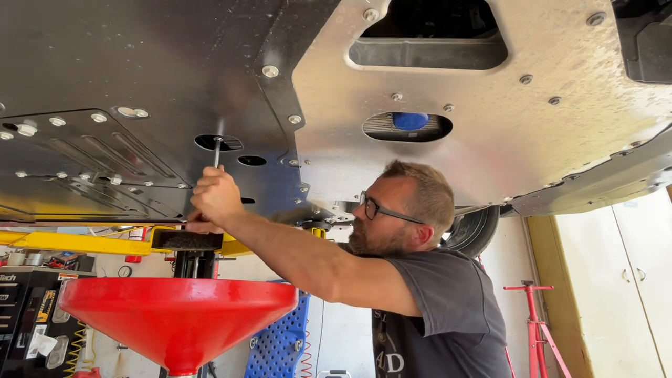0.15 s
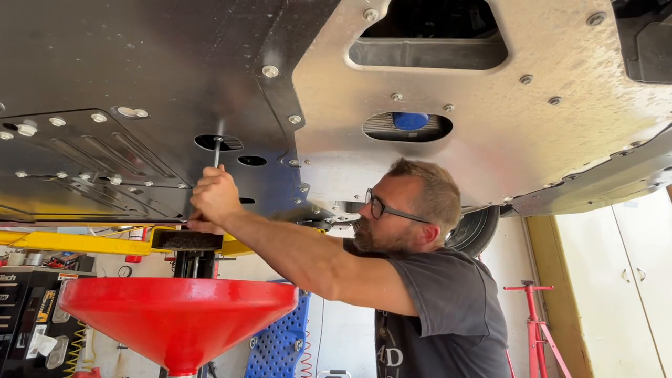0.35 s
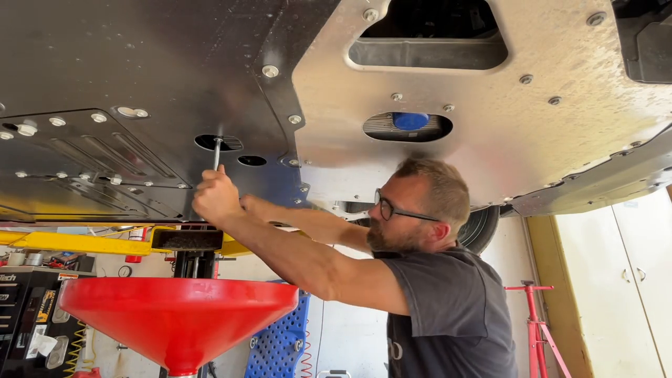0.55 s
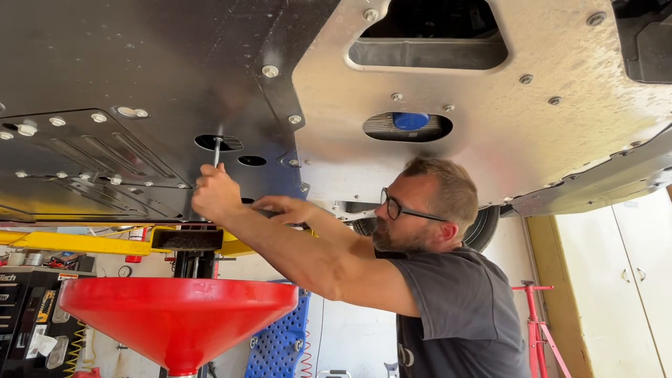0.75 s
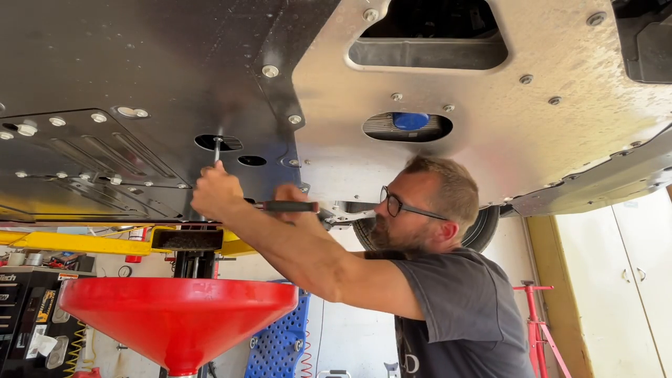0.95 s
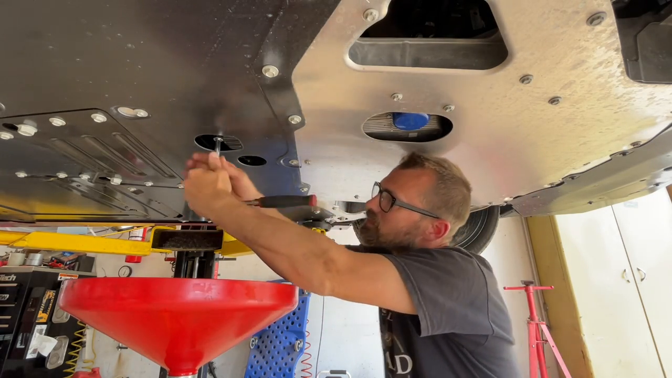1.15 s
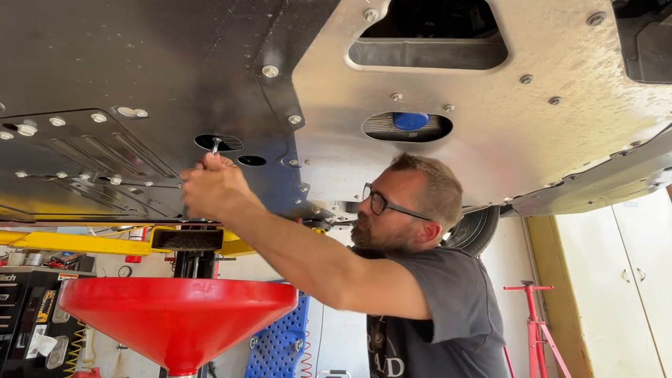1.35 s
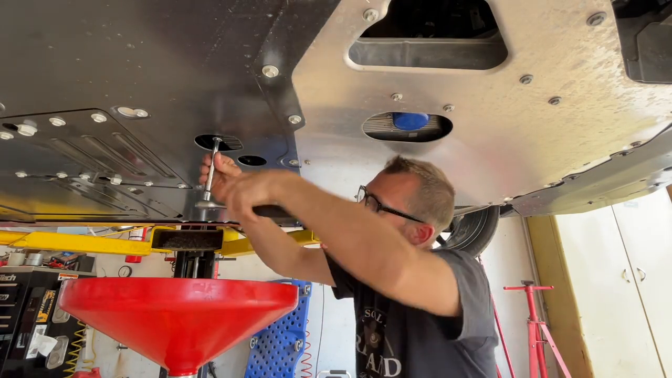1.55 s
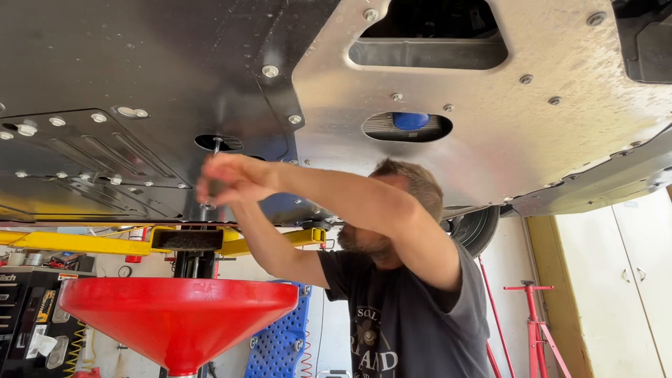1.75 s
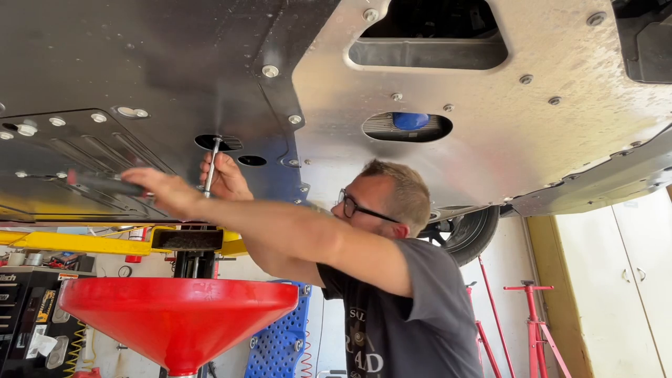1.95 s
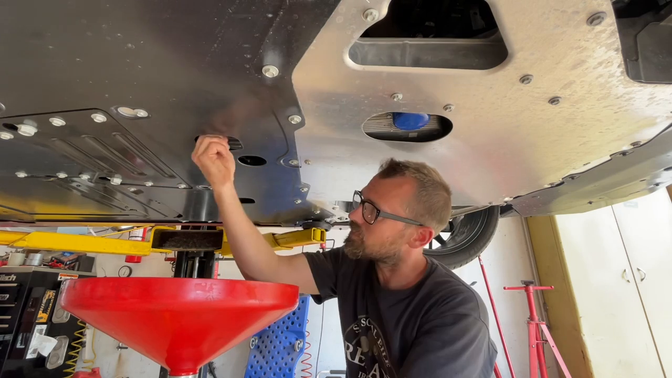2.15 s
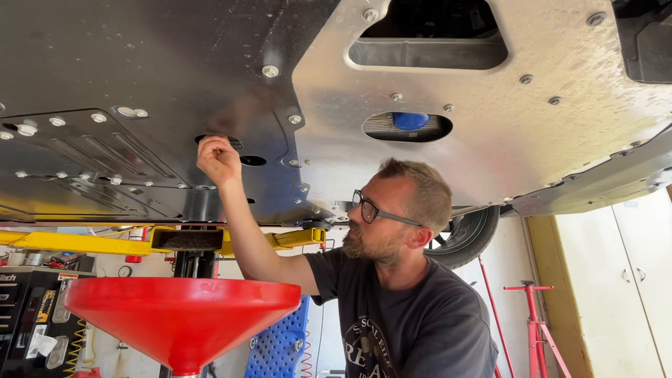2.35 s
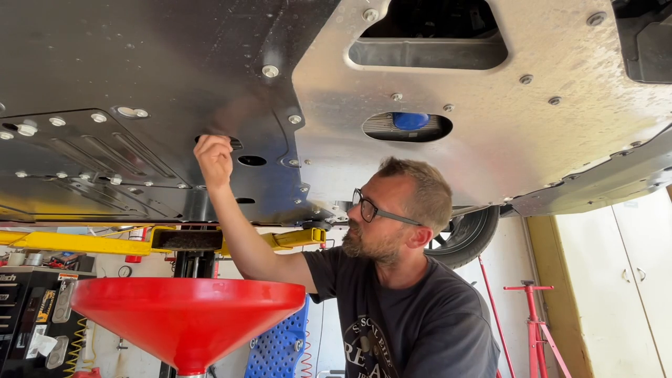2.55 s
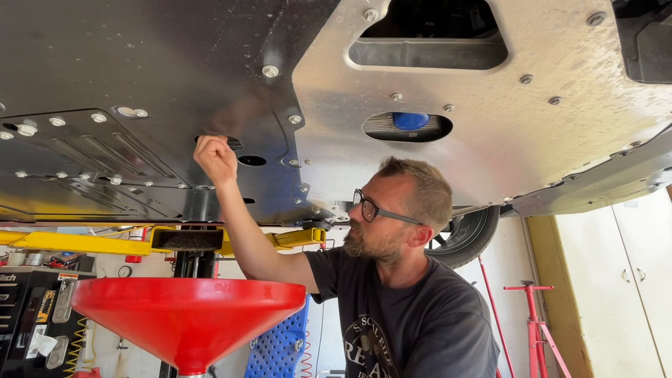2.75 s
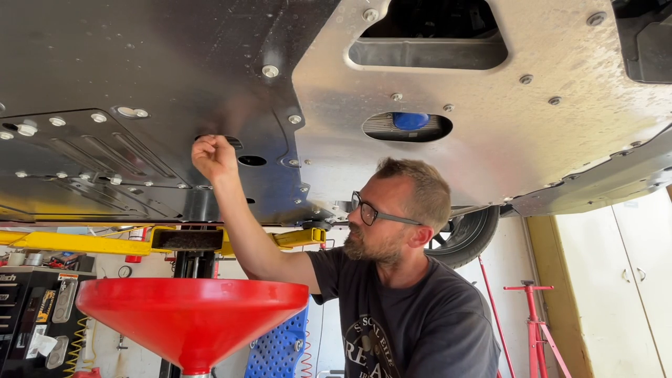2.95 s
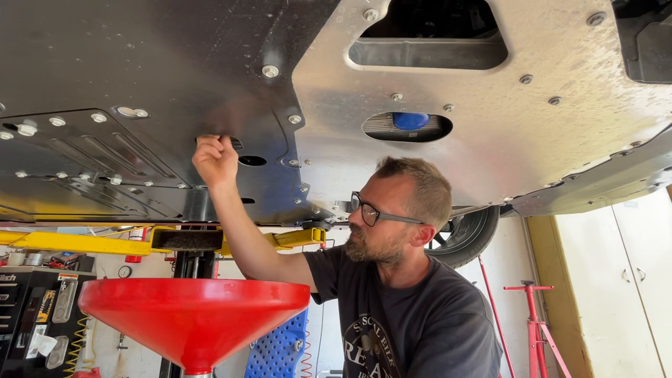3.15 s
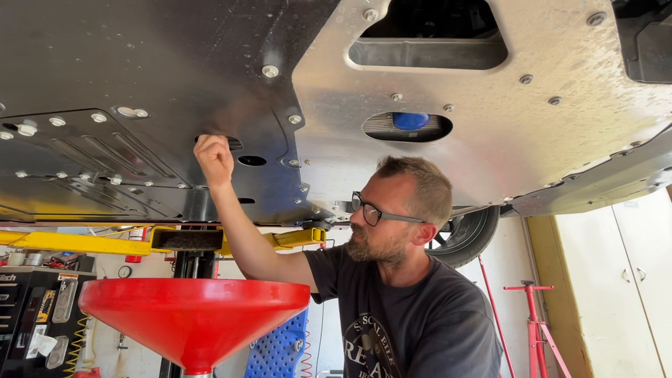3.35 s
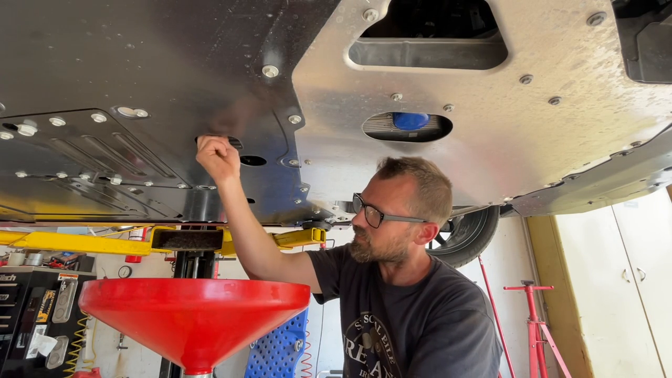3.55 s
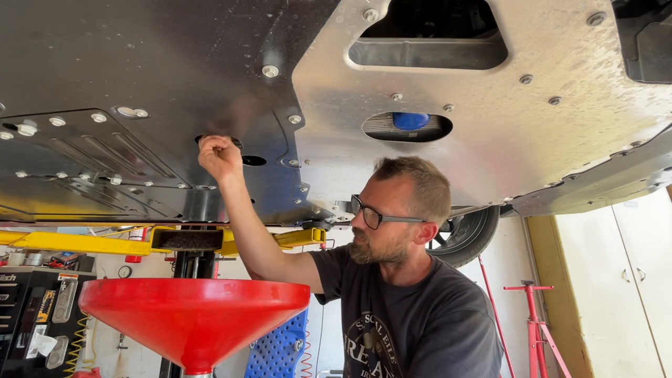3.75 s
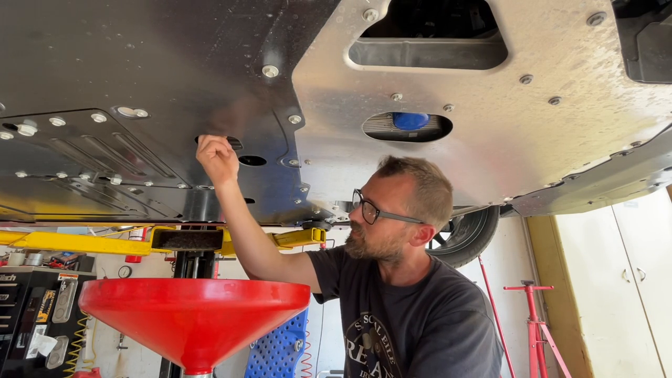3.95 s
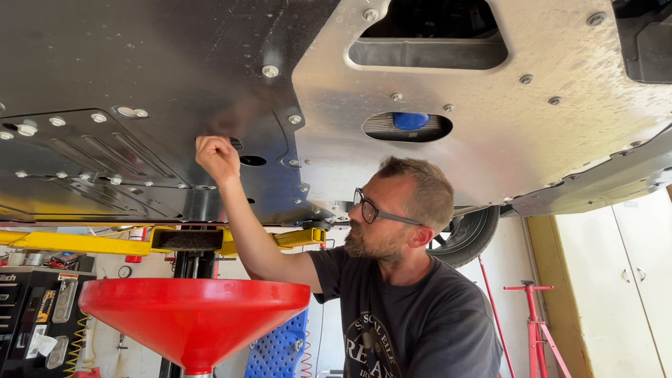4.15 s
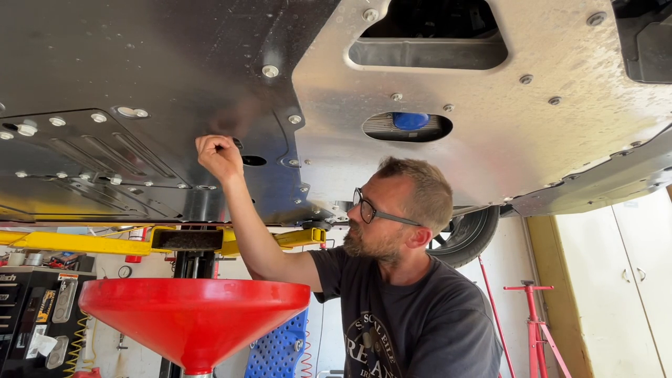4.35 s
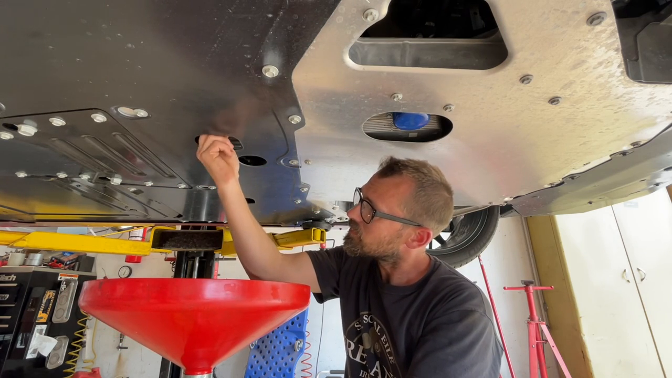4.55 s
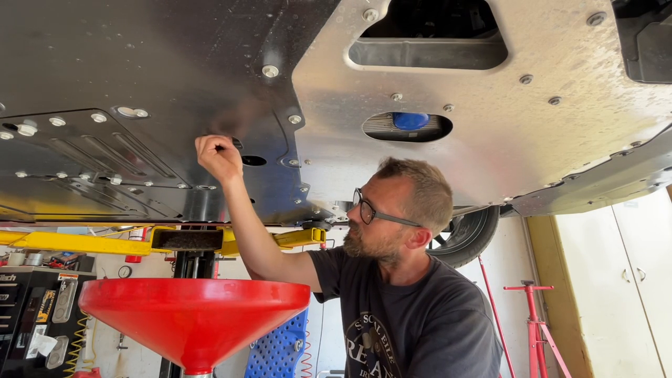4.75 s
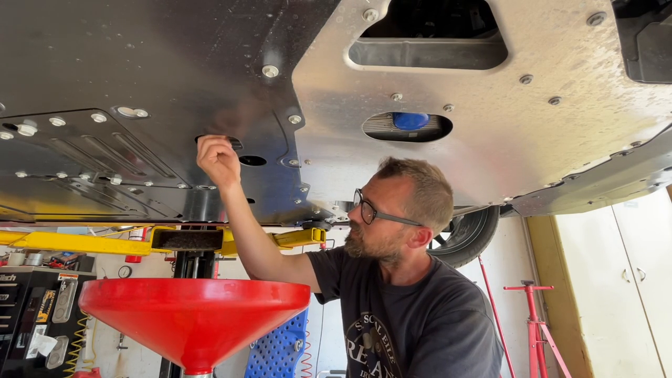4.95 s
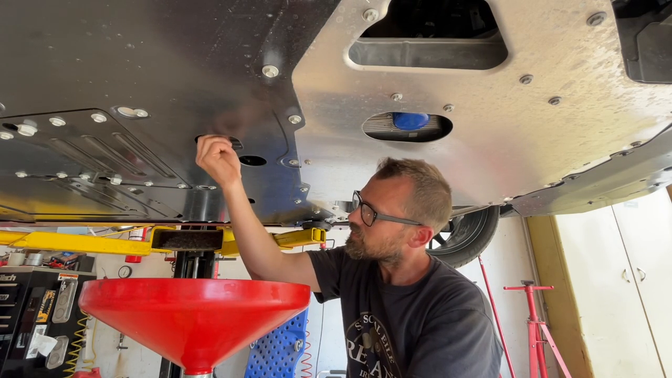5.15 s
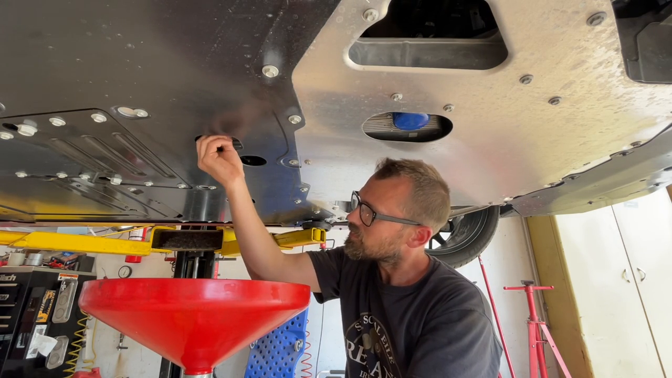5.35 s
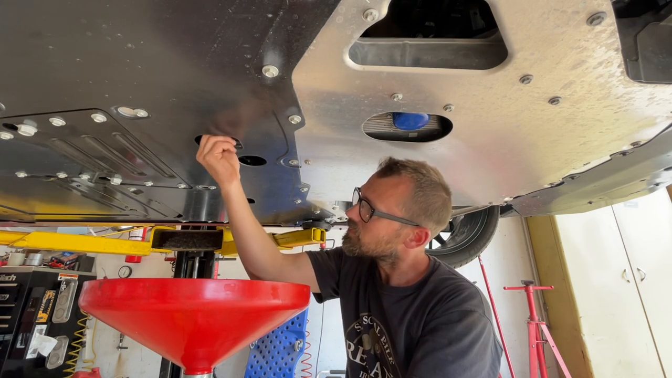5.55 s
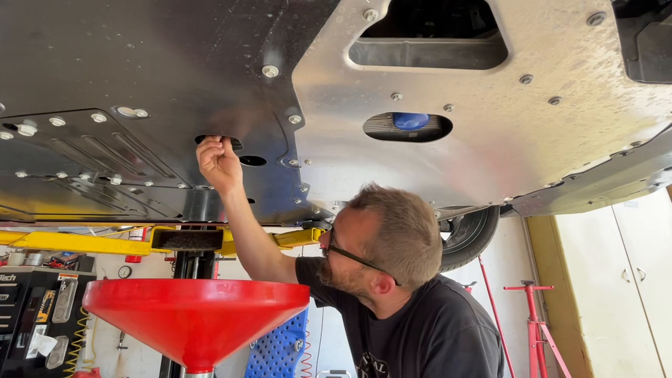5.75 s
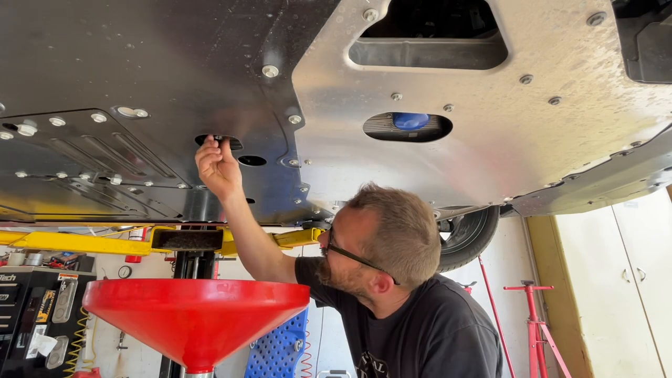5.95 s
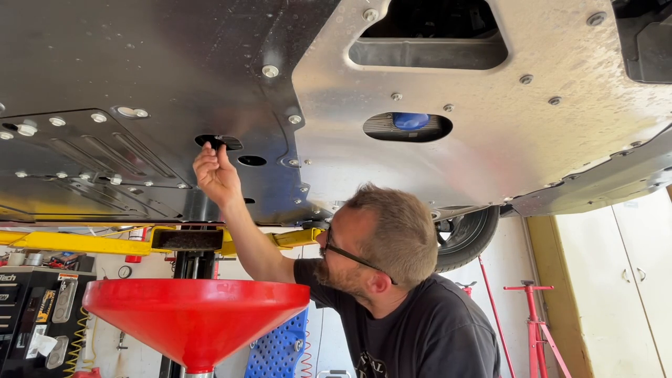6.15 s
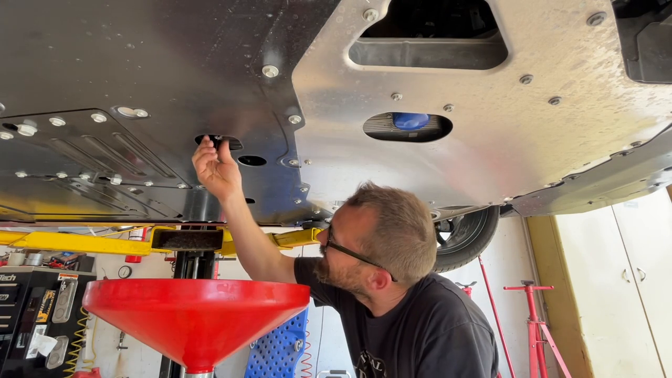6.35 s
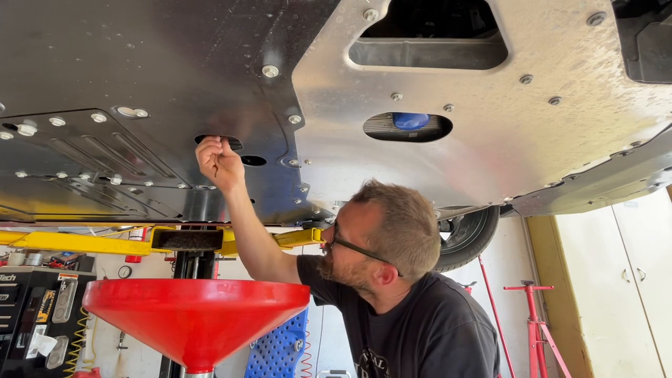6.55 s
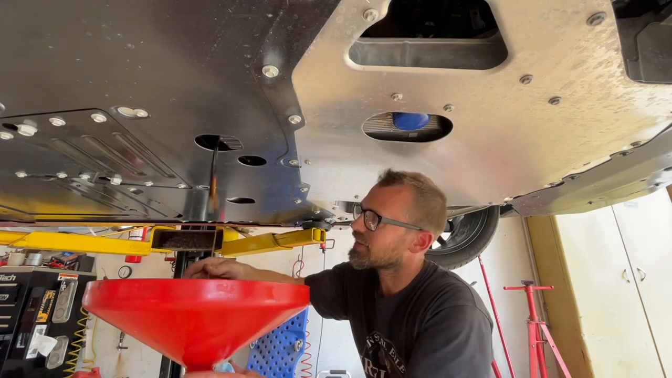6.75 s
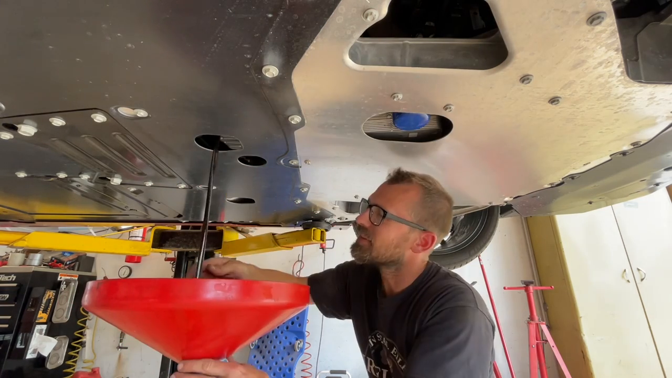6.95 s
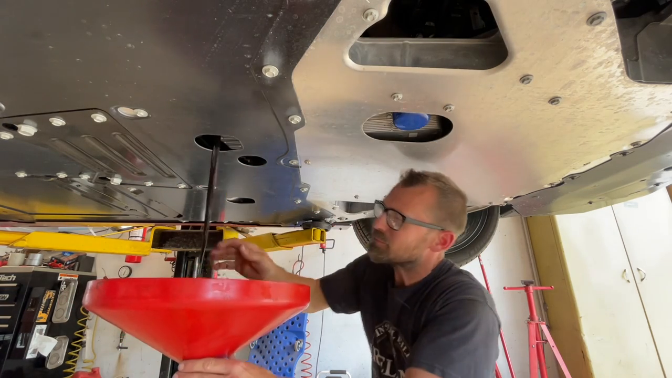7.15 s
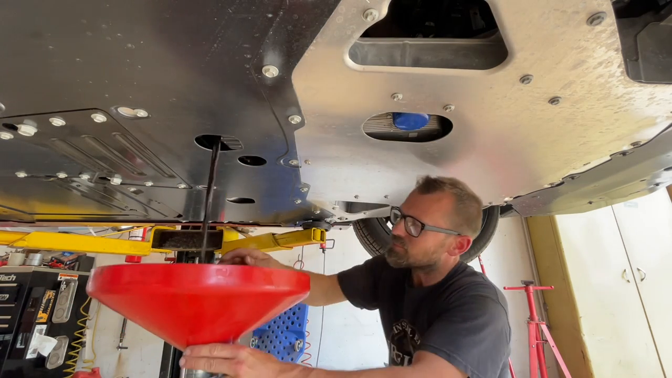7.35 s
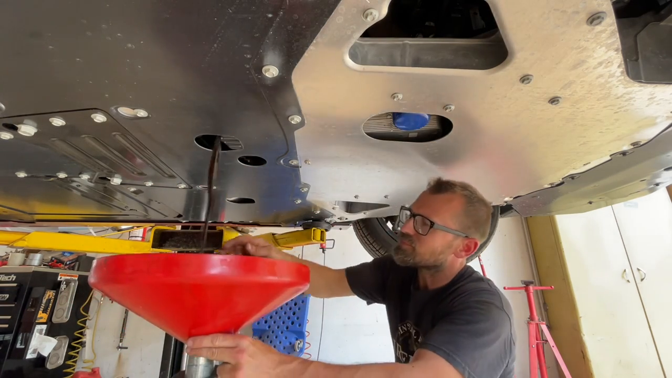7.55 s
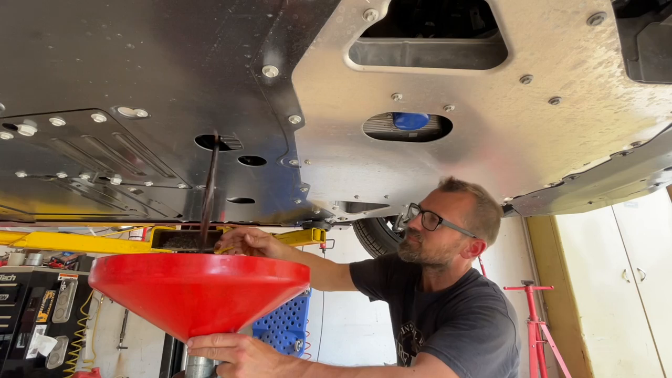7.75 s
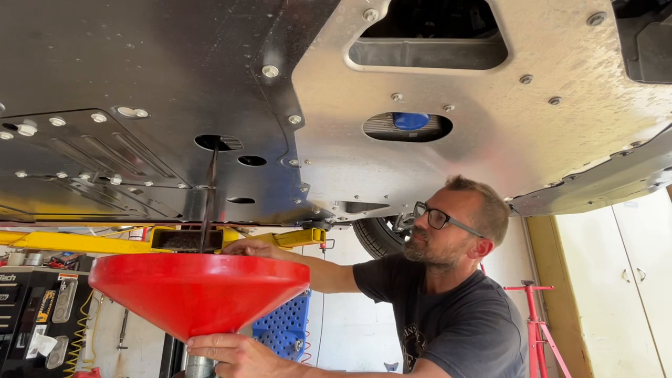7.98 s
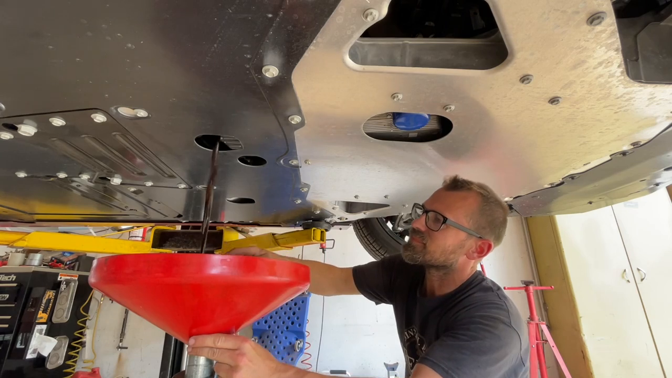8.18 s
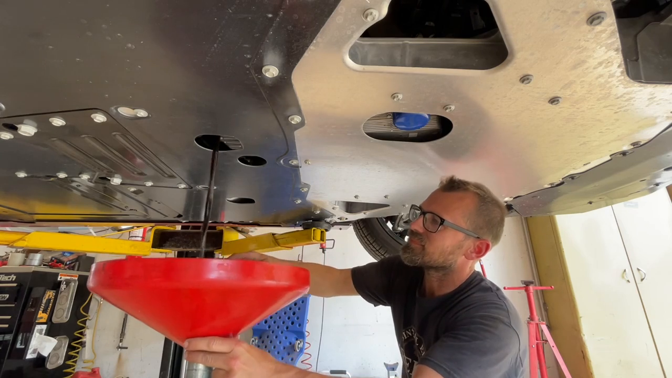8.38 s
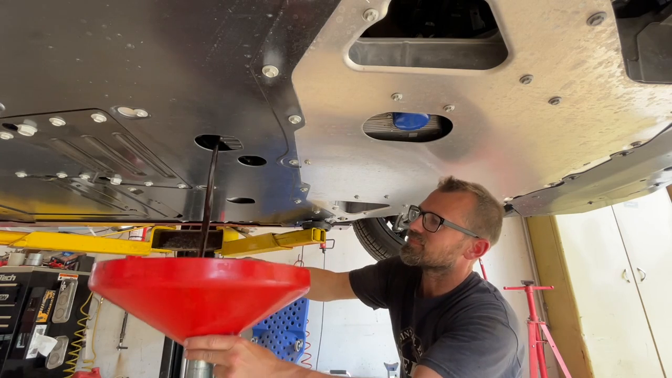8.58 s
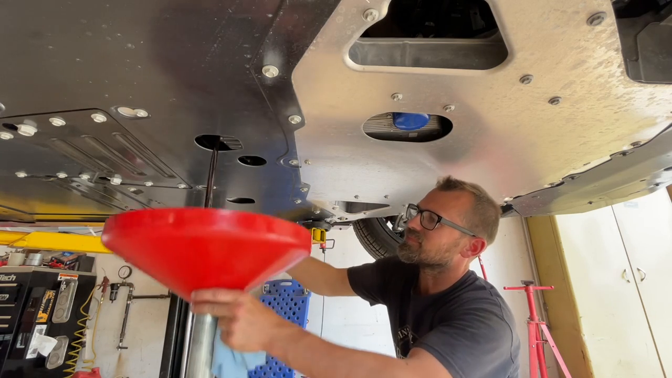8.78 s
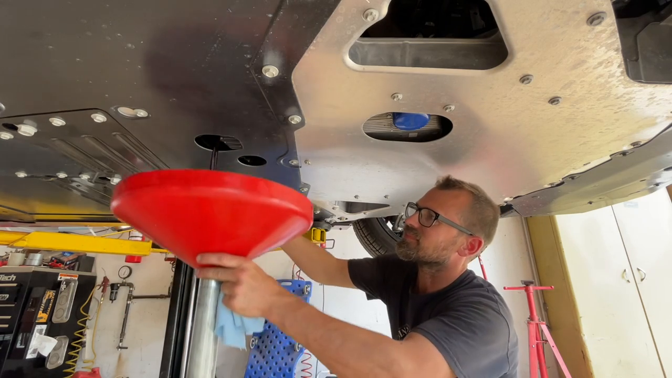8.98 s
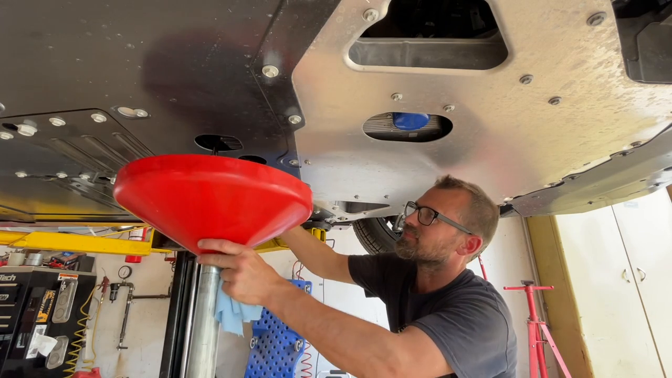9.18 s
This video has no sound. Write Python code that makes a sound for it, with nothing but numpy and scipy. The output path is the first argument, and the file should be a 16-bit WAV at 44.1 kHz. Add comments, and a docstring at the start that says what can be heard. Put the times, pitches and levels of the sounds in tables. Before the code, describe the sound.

In a garage, quiet scrapes and tiny squeaks of unscrewing lead to a loud hollow plastic clatter, crackling oil, and a ringing steel pipe.

```python
"""An oil change under a car on a lift, in an open garage. A wrench clinks: modal resonators struck by clicks.
Fingers spin the drain plug out, as shaped noise, amid faint airy squeaks of gliding narrow-band noise; a soft
wide rush of noise joins in before the plug drops. It clatters in a plastic funnel, again as struck resonators,
and oil gushes and spatters after it, as random grains, bubbles and bursts. The funnel is slid up its steel pipe,
which rings as decaying sines. Two microphone ports and a decaying-noise room carry the sound."""
import sys
import numpy as np
from scipy import signal
from scipy.fft import rfft, irfft, next_fast_len
from scipy.io import wavfile
from scipy.ndimage import uniform_filter1d

SR = 44100
rng = np.random.default_rng(int(sys.argv[2]) if len(sys.argv) > 2 else 0)


def store_pcm(level_fs):
    """Save levels as 16-bit WAV."""
    pcm = np.round(np.clip(level_fs, -1, 1) * 32767).astype(np.int16)
    wavfile.write(sys.argv[1], SR, np.atleast_2d(pcm).T)


N = 406372
TIME = np.arange(N) / SR

# All levels are relative: gains in the functions and in the mix follow them.
# the hand on the wrench, then on the plug: (time [s], length [s], pressure level [dB], skin hiss level [dB])
HAND_HOLDS = [(0, 0.09, -59.5, -76), (.36, 0.22, -60.5, -76), (.66, 0.53, -78, -88.5),
              (1.2, 0.28, -91, -79), (1.55, 0.55, -110, -93.5), (2.2, 2.26, -74.5, -90),
              (4.6, 1.08, -77.5, -90)]
HOLD_ATTACK_S, HOLD_RELEASE_S = 0.017, 0.11
# pushes of the fingers: (time of the height [s], length [s], pressure level [dB], skin hiss level [dB])
FINGER_STROKES = [(.87, 0.23, -89.5, -79), (1.12, 0.17, -69, -86), (1.335, 0.08, -78, -97),
                  (2.215, 0.081, -66.5, -77.5), (2.365, 0.031, -63.5, -97), (2.425, 0.088, -66, -74),
                  (2.5, 0.26, -61.5, -98), (2.67, 0.085, -60.5, -84), (2.93, 0.19, -64.5, -77.5),
                  (3.06, .22, -60.5, -79.5), (3.24, 0.27, -63, -77), (3.385, 0.057, -61.5, -76),
                  (3.52, 0.28, -65.5, -77), (3.68, 0.22, -57, -77.5), (3.85, 0.088, -68.5, -83),
                  (4.0, 0.062, -62, -76), (4.26, 0.26, -59, -81.5), (4.43, 0.134, -64.5, -75.5),
                  (4.83, 0.21, -60.5, -80), (5.01, 0.087, -64, -100), (5.29, 0.14, -63, -82),
                  (5.8, 0.104, -54.5, -99), (6.03, 0.063, -75, -73.5), (6.26, 0.29, -78, -74)]
# thread rumble at the reference pressure
REFERENCE_PRESSURE_DB, THREAD_DB = -65, -64.5
# the plug judders in its thread and the belly pan hums: (time [s], length [s], level [dB])
THREAD_JUDDERS = [(2.978, 0.14, -52.5), (3.828, 0.1, -53.5), (4.126, 0.29, -56), (4.376, 0.25, -56),
                  (4.99, 0.12, -59)]
# spectrum of the thread rumble: (frequency [Hz], density [dB per Hz])
RUMBLE_SPECTRUM = [(25, -12.5), (55, 3), (110, 2), (170, -8), (240, -1), (330, -15), (600, -50)]
# spectrum of rubbing on the belly pan: (frequency [Hz], density [dB per Hz])
RUBBING_SPECTRUM = [(130, -14.5), (260, -1.5), (500, 3), (750, 5), (1300, -1), (2000, -9), (3500, -15.5),
                    (7000, -60.5)]
# spectrum of the skin hiss: (frequency [Hz], density [dB per Hz])
SKIN_SPECTRUM = [(1500, -35.5), (3000, 12), (5000, 2.5), (7500, 3.5), (10500, -1), (12000, -3.5),
                 (13500, -37)]

# wrench on plug and belly pan: (time [s], thud level [dB], clack level [dB], crack level [dB])
WRENCH_BLOWS = [(0.057, -51, -43, -60), (0.352, -39.5, -32.5, -37), (0.356, -38, -27, -50),
                (0.469, -50, -60, -74), (0.53, -60, -64, -72), (0.575, -68, -76, -64),
                (0.66, -71, -76, -80), (0.942, -82, -71, -89), (1.049, -75, -65, -86),
                (1.141, -78, -66, -79), (1.284, -75, -79, -60), (1.359, -76, -70, -59),
                (1.477, -101, -71, -48), (2.07, -79.5, -76, -61.5)]
# resonances under the wrench: (frequency [Hz], width [Hz], level [dB])
WRENCH_MODES = [(417, 28, 2.5), (828, 55, 4.5), (1020, 100, 0.5), (1224, 62, -4), (1680, 350, -6),
                (2060, 430, -7.5), (2640, 600, -11.5), (3350, 1000, -11), (4350, 960, -9), (5200, 940, -7)]
# ringing of the wrench's shaft: (frequency [Hz], level against the crack [dB], t60 [s])
SHAFT_MODES = [(2160, -26.5, 0.25), (3580, -23, 1.3), (4434, -19.5, 0.55)]
# a contact whose crack lies this far under its clack has the clack's top at CLACK_TOP_HZ; softer ones are duller
HARD_CRACK_DB, CLACK_TOP_HZ, DULLING_DB_PER_OCTAVE = -16.5, 2420, 8

# airy swishes: (time [s], length [s], start frequency [Hz], width [Hz], level [dB], rise [octaves per s])
RISING_SWISHES = [(0.76, 0.1, 1400, 510, -70, 7), (0.855, 0.052, 3150, 220, -65, 4.2),
                  (0.85, 0.05, 6000, 400, -73, 7.5), (1.09, 0.079, 678, 400, -62, 6),
                  (1.195, 0.089, 1650, 700, -60.5, 5.3), (1.32, 0.26, 2400, 400, -72, 2.7),
                  (1.48, 0.24, 3150, 450, -69.5, 1.7), (1.68, 0.55, 3800, 350, -79, 0.3)]
# hums of the belly pan as the wrench brushes it: (time [s], length [s], frequency [Hz], width [Hz], level [dB])
BELLY_PAN_HUMS = [(1.27, 0.0835, 218, 33, -66), (1.305, 0.1, 710, 25, -65.5)]
# faint airy squeaks: (time [s], length [s], start frequency [Hz], width [Hz], level [dB])
FALLING_SQUEAKS = [(1.59, 0.12, 4480, 344, -64.5), (1.96, .1, 4600, 800, -66.5),
                   (2.19, 0.086, 3600, 1490, -64.5), (2.22, 0.17, 2400, 120, -70.5),
                   (2.7, 0.33, 3020, 260, -66), (2.77, 0.057, 3360, 198, -70), (3.1, 0.1, 4620, 260, -62),
                   (3.14, 0.086, 3920, 260, -62), (3.2, 0.12, 3480, 400, -65), (3.22, 0.14, 4600, 450, -75),
                   (3.31, 0.19, 2980, 300, -64.5), (3.39, 0.2, 3780, 253, -67.5),
                   (4.429, 0.14, 4370, 500, -64), (4.448, 0.19, 3740, 600, -61.5),
                   (4.59, 0.066, 4850, 300, -57.5), (4.63, 0.14, 3886, 910, -57.5),
                   (4.66, 0.054, 3400, 200, -60), (4.995, 0.07, 2500, 162, -68),
                   (5.12, 0.097, 4250, 900, -70), (5.16, 0.093, 2930, 153, -65.5),
                   (5.24, 0.08, 2150, 250, -65.5), (5.27, 0.06, 2460, 139, -63),
                   (5.42, 0.11, 2850, 130, -67.5), (5.5, 0.08, 2100, 300, -69),
                   (5.53, 0.058, 4330, 400, -71.5), (5.54, 0.042, 2434, 160, -62.5),
                   (5.63, 0.1, 3900, 1000, -73.5), (5.68, 0.06, 2880, 150, -66),
                   (5.94, 0.13, 4600, 1600, -61.5), (6.69, 0.07, 4300, 700, -69)]
SQUEAK_FALL_OCTAVES_PER_S, WAVER_OCTAVES = 1.05, 0.025

# fingers bumping the plug round: (time [s], thud level [dB], clack level [dB], crack level [dB])
FINGER_BUMPS = [(2.438, -45.5, -68, -77), (2.474, -42, -52, -78), (2.657, -47.5, -57.5, -60),
                (3.011, -35.5, -43.5, -62.5), (3.7, -50, -57, -87), (4.2, -56, -54.5, -61),
                (4.235, -52, -60, -60.5), (4.41, -50, -51, -54.5), (5.29, -58, -82, -74),
                (6.413, -44, -48.5, -55.5), (6.45, -40.5, -45, -62)]

# soft wide rush of noise before the plug drops: (time [s], length [s], level [dB])
RUSH_SPELLS = [(5.75, 1.0, -56), (6.795, .08, -54)]
RUSH_ATTACK_S, RUSH_RELEASE_S = 0.02, 0.021
# hiss of the rush: (time of the height [s], length [s], level [dB])
RUSH_HISS_SWELLS = [(6.2, 1, -70.5), (6.83, 0.12, -69.5)]
# spectrum of the rush: (frequency [Hz], density [dB per Hz])
RUSH_SPECTRUM = [(30, 5), (70, 17), (120, 7.5), (250, 3), (600, 2.5), (1300, 3), (2000, -1.5),
                 (3000, -11.5), (5000, -23), (7500, -28), (11500, -44), (13500, -55)]

# the oil stream: (time [s], drumming level [dB], spatter level [dB])
OIL_STREAM = [(6.86, -78, -64.5), (7.07, -43.5, -55), (7.36, -30.5, -40.5), (7.55, -37.5, -42.5),
              (7.68, -43.5, -42), (7.95, -44, -42), (8.01, -49.5, -48.5), (8.11, -46.5, -41.5),
              (8.28, -48.5, -46.5), (8.36, -33.5, -41), (8.49, -39, -46), (8.86, -38, -49.5),
              (9.21, -44, -58.5)]
# spectrum of the drumming on the funnel: (frequency [Hz], density [dB per Hz])
DRUMMING_SPECTRUM = [(30, -9.5), (70, 6), (130, 6.5), (250, 3.5), (450, 2.5), (600, -4.5), (780, -0.5),
                     (1200, -2.5), (1650, 3), (2100, -3.5), (4000, -20)]
# spectrum of the spatter: (frequency [Hz], density [dB per Hz])
SPATTER_SPECTRUM = [(600, -32), (1500, -15.5), (2700, 3), (3700, 2.5), (5000, 1), (7500, 4.5), (9000, 5),
                    (10500, -1), (12000, 3), (12700, -30), (13500, -10)]
# the loudest spits of oil: (time [s], smack level [dB], fizz level [dB])
LOUD_SPITS = [(7.262, -27, -34), (7.392, -30.5, -32.5), (7.548, -51, -29), (7.611, -32.5, -24.5),
              (7.667, -33, -29), (7.696, -34, -30), (7.714, -31, -30), (7.753, -47, -34), (7.791, -36, -34),
              (7.822, -43, -33.5), (7.888, -25.5, -52), (8.011, -62, -39.5), (8.055, -37, -35),
              (8.098, -34, -24), (8.18, -41, -34), (8.194, -36, -32), (8.254, -59, -37),
              (8.305, -34, -36.5), (8.34, -39, -26.5), (8.595, -53, -40.5)]
# lesser spits come at random, their levels counted from that of the spatter
SPITS_PER_S, SMACK_DB, FIZZ_DB, SPIT_SPREAD_DB = 9, 4, -1, -1

# the plug rolls in the funnel, then the collar is pushed up its pipe:
# (time [s], length [s], rumble level [dB], rasp level [dB])
SCRAPE_SPELLS = [(6.872, 0.017, -55, -22.5), (6.905, 0.07, -33, -31), (6.98, 0.13, -35.5, -33),
                 (7.44, 0.064, -40.5, -30), (8.315, 0.054, -41.5, -34.5), (8.415, 0.038, -32.5, -27.5),
                 (8.731, 0.075, -39.5, -29), (8.815, 0.046, -38.5, -34), (8.855, 0.09, -37, -33),
                 (8.96, 0.076, -51, -41), (9.04, 0.068, -37.5, -36.5)]
SCRAPE_ATTACK_S, SCRAPE_RELEASE_S = 0.004, 0.0091
SLIP_COLOUR_DB = 4.5  # swing of each resonance as the contact moves
# knocks on the funnel: (time [s], thud level [dB], clack level [dB], crack level [dB])
FUNNEL_KNOCKS = [(6.89, -7.5, -10, -32.5), (6.907, -25, -23, -41.5), (7.133, -19, -10.5, -23),
                 (7.166, -22.5, -10.5, -27), (7.186, -34, -24.5, -44), (7.271, -19, -9.5, -26),
                 (7.323, -9.5, -16.5, -34), (7.35, -25, -35, -34), (7.431, -19.5, -28, -48.5),
                 (7.476, -19, -31, -48.5), (7.562, -23, -44, -54), (7.605, -28, -62, -54),
                 (7.682, -28, -56, -46), (7.875, -31.5, -48, -57), (8.352, -29, -23.5, -43.5),
                 (8.415, -24.5, -20, -29), (8.441, -19, -38, -35.5), (8.613, -30.5, -32, -38.5)]
# resonances of the plastic funnel: (frequency [Hz], width [Hz], level [dB])
FUNNEL_MODES = [(120, 53, -23), (314, 103, -7.5), (476.3, 85, 4), (737.4, 61, 5), (1058, 64, 6.5),
                (1294, 38, 1), (1657, 23, 0), (2060, 44, 0.5), (2520, 510, -14), (3570, 2200, -49)]
# the whole funnel wobbles on its stand: (time [s], frequency [Hz], level [dB])
FUNNEL_WOBBLES = [(6.897, 76.4, -28), (6.891, 144, -36), (7.179, 120, -25), (7.486, 129, -31.5),
                  (7.558, 125, -28.5), (8.453, 109.7, -28), (8.783, 136, -33)]
# drops and glugs that plop into the pooled oil: (time [s], frequency [Hz], level [dB])
OIL_DROPS = [(7.382, 320, -30), (7.432, 893, -28), (7.465, 1597, -19.5), (7.572, 736, -43),
             (7.652, 749, -30.5), (7.656, 400, -25), (7.682, 710, -43), (7.772, 2365, -32.5),
             (7.82, 1275, -36), (7.875, 728, -27), (7.886, 2355, -32.5), (7.91, 1510, -42),
             (8.183, 1454, -27.5), (8.205, 2000, -33.5), (8.228, 1236, -32), (8.362, 1630, -23.5),
             (8.555, 470, -33), (8.612, 678, -35)]
DROP_RING_S, DROP_RISE_PER_S = 0.015, 2.46

# the steel pipe is jarred: (time [s], level [dB], extra level of upper modes [dB], ring length factor)
PIPE_BLOWS = [(7.43, -47, 8, 0.82), (7.476, -34, -4.5, 0.48), (7.56, -39, -12, 0.2), (8.35, -57, -17, 0.96),
              (8.415, -37, 6, 0.4), (8.731, -41, 4, 1.44)]
# modes of the steel pipe: (frequency [Hz], level [dB], t60 at ring length factor 1 [s])
PIPE_MODES = [(3990, 0.5, 0.33), (4500, 0, 0.17), (6750, 1, 0.86), (6720, 4.5, 0.56), (8100, 3, 0.37),
              (12000, 5, 0.17), (12200, -2, 0.08)]
# the collar jerks up the pipe: (time [s], thud level [dB], clack level [dB], crack level [dB])
JERKS = [(8.732, -45, -20.5, -38.5), (8.757, -40, -31, -36), (8.77, -34, -22.5, -41.5),
         (8.778, -20.5, -33, -31.5), (8.791, -26, -23.5, -40), (8.8, -35, -25, -40), (8.833, -27, -28, -41),
         (8.865, -24, -19, -41), (8.897, -36, -24, -51), (8.946, -27, -43, -41)]
# resonances of the collar: (frequency [Hz], width [Hz], level [dB])
COLLAR_MODES = [(323, 45, -4.5), (473, 67, 4.5), (795, 61, 6.5), (860, 31, 6.5), (906, 36, 0),
                (1073, 28, -4.5), (1400, 110, -23.5), (1680, 72, -27.5), (2130, 200, -22)]

# reverberation of the garage: (frequency [Hz], t60 [s])
GARAGE_DECAY = [(100, 0.55), (400, 0.44), (1000, 0.35), (2500, 0.37), (5000, 0.37), (12000, 0.085)]
# two microphone ports: (frequency [Hz], phase lead of the left [rad], left over right level [dB],
# share of panel reflections [0-1])
PORT_RESPONSE = [(30, 2.5, -8, 0), (133, -0.48, -3, 0.05), (382, 0.97, -3, 0.06), (870, 1.46, 4.5, 0.4),
                 (1360, 2.5, 0.5, 0.25), (2050, 3, -1, 0.6), (2400, 4, 0, 0), (3200, 4.5, 5, 0.4),
                 (4400, 6.5, 0.5, 0.2), (5200, 3, 8.5, 0.8), (7000, 9, 6, 1), (8240, 10.5, -1, 0.3),
                 (8750, 8, 3.5, 0.05), (10200, 0.5, -4, 0), (10870, -0.5, 2.8, 0), (12030, 2.2, 0.5, 0.07),
                 (13000, -2, 0, 0.3), (17030, -5.5, 0.5, 0.3)]
# the drain hole lies further to the side than the funnel, so its sound reaches the left port earlier still
DRAIN_LEAD_S = 0.00021
TREBLE_EDGE_HZ, CUTOFF_HZ = 13050, 15500


def from_db(db):
    """A level in decibels is twenty times the logarithm of amplitude."""
    return 10 ** (np.asarray(db) / 20)


def rms_one(x):
    """Dividing by the root mean square normalises the power."""
    return x / np.sqrt(np.mean(x ** 2) + 1e-20)


def evened(x, window_s):
    """Dividing by a running rms levels the envelope but leaves the finer roughness."""
    return x / np.sqrt(np.abs(uniform_filter1d(x ** 2, int(window_s * SR))) + 1e-12)


def add(track, s, sound):
    """Superposition: sounds that overlap in time add."""
    start = max(int(s * SR), 0)
    track[start:start + len(sound)] += sound[:N - start]


def in_time(rows):
    """Levels interpolated in decibels give gains, one for each level column; silent outside the curve."""
    s, *columns = np.transpose(rows)
    return [from_db(np.interp(TIME, s, c, left=-140, right=-140)) for c in columns]


def at_hz(points, hz, axis=1):
    """Interpolation of a column on a logarithmic frequency scale."""
    table = np.array(points)
    return np.interp(np.log(hz + 1), np.log(table[:, 0]), table[:, axis])


def swells(rows):
    """Raised-cosine gains centred on each row's time, one for each level column."""
    out = np.zeros((len(rows[0]) - 2, N))
    for s, length, *levels in rows:
        for track, db in zip(out, levels):
            add(track, s - length / 2, from_db(db) * np.hanning(int(length * SR)))
    return out


def spells(rows, attack_s, release_s):
    """Gains with linear attack, hold and exponential release, one for each level column."""
    out = np.zeros((len(rows[0]) - 2, N))
    for s, length, *levels in rows:
        t = TIME[:int((length + 10 * release_s) * SR)]
        shape = np.minimum(t / attack_s, 1) * np.exp(-np.maximum(t - length, 0) / release_s)
        for track, db in zip(out, levels):
            add(track, s, from_db(db) * shape)
    return out


def drift(rate):
    """Random knots, rate per second, joined by lines make a slow fluctuation of rms 1."""
    knots = rng.standard_normal(int(rate * N / SR) + 2)
    return rms_one(np.interp(TIME * rate, np.arange(len(knots)), knots))


def grains(per_s, spread_db, clump_db):
    """Impulses at random instants, of uneven size and either sign; a slow drift makes loud and soft clumps."""
    born = rng.random(N) < per_s / SR
    sizes = from_db(spread_db * np.minimum(rng.exponential(1, N), 4)) * rng.choice([-1, 1], N)
    return born * sizes * from_db(clump_db * drift(110))


def colour(x, spectrum):
    """Multiplication in the frequency domain shapes the spectrum; rms 1."""
    size = next_fast_len(N, real=True)
    gain = from_db(at_hz(spectrum, np.fft.rfftfreq(size, 1 / SR)))
    return rms_one(irfft(rfft(x, size) * gain, size)[:N])


def band(x, low_hz, high_hz, order=2):
    """A Butterworth band-pass has a maximally flat passband."""
    edges = [low_hz, min(high_hz, .45 * SR)]
    return signal.sosfilt(signal.butter(order, edges, "band", fs=SR, output="sos"), x)


def resonate(x, modes):
    """Resonators in parallel, each a pole pair whose radius sets its width, with valleys between them."""
    out = 0
    for hz, width, db in modes:
        r = np.exp(-np.pi * width / SR)
        zeros = np.array([1, 0, -1]) * (1 - r * r) / 2
        poles = [1, -2 * r * np.cos(2 * np.pi * hz / SR), r * r]
        out = out + from_db(db) * signal.lfilter(zeros, poles, x)
    return out


def at_level(sound, db):
    """Onset level: sets the rms of the first 15 ms."""
    return sound * from_db(db) / np.sqrt(np.mean(sound[:int(.015 * SR)] ** 2) + 1e-20)


def blows(hits, modes, chatter_s, chatter_db, bare_db, low_hz, top_hz):
    """Impact excitation: a click and decaying chatter ring a body's modes, levelled as thud, clack and crack."""
    out, t = np.zeros(N), TIME[:SR // 4]
    for s, thud_db, clack_db, crack_db in hits:
        chatter = rng.standard_normal(len(t)) * np.exp(-t / chatter_s)
        contact = from_db(chatter_db) * chatter
        contact[0] += 1
        # each blow lands on a new spot, which favours other modes
        body = resonate(contact, [(hz, width, db + rng.standard_normal()) for hz, width, db in modes])
        hardness_octaves = (crack_db - clack_db - HARD_CRACK_DB) / DULLING_DB_PER_OCTAVE
        clack_top = np.clip(CLACK_TOP_HZ * 2 ** hardness_octaves, 1400, 2700)
        thud = at_level(band(body, low_hz, 595, order=3), thud_db)
        clack = at_level(band(body, 665, clack_top, order=3), clack_db)
        # some of the chatter sounds directly, past the modes
        crack = at_level(band(body + from_db(bare_db) * chatter, 2900, top_hz, order=4), crack_db)
        add(out, s, thud + clack + crack)
    return out


def hand():
    """Friction: pressure drives the thread's rumble and rubbing on the belly pan; skin adds hiss."""
    holds = spells(HAND_HOLDS, HOLD_ATTACK_S, HOLD_RELEASE_S)
    pressure, skin = np.hypot(holds, swells(FINGER_STROKES))
    rumble = from_db(THREAD_DB) * pressure / from_db(REFERENCE_PRESSURE_DB)
    thread = rumble * colour(rng.standard_normal(N), RUMBLE_SPECTRUM)
    hum_mode = [(106.5, 14, 0)]
    hum = evened(resonate(resonate(rng.standard_normal(N), hum_mode), hum_mode), .12)
    for s, length, db in THREAD_JUDDERS:
        arch = np.sqrt(np.abs(np.sin(np.pi * np.clip((TIME - s) / length, 0, 1))))
        thread += from_db(db) * hum * arch
    rub = from_db(3.5) * pressure * colour(grains(1200, spread_db=2.0, clump_db=2.5), RUBBING_SPECTRUM)
    hiss = from_db(10.5) * skin * colour(grains(6300, spread_db=4.0, clump_db=0.0), SKIN_SPECTRUM)
    return thread + rub + hiss


def wrench_ring():
    """Lightly damped modes: the steel shaft rings on faintly after each crack as decaying sines."""
    out, t = np.zeros(N), TIME[:SR]
    for s, _, _, crack_db in WRENCH_BLOWS:
        for hz, db, t60 in SHAFT_MODES:
            add(out, s, from_db(crack_db + db - 60 * t / t60) * np.sin(2 * np.pi * hz * t))
    return out


def wrench_blows():
    """Impact of the wrench on the plug and belly pan, with the shaft's ringing."""
    struck = blows(WRENCH_BLOWS, WRENCH_MODES, chatter_s=0.0041, chatter_db=-14.0, bare_db=-16.5,
                   low_hz=288, top_hz=11120)
    return from_db(1.0) * struck + wrench_ring()


def glides(notes, broken_db):
    """Low-passed noise on a gliding, wavering quadrature carrier is a narrow moving band; its level breaks up."""
    out = np.zeros(N)
    grip, waver = rms_one(from_db(broken_db * drift(55))), WAVER_OCTAVES * drift(70)
    for s, length, start_hz, width_hz, db, octaves_per_s in notes:
        u = np.linspace(0, 1, int(length * SR))
        hz = start_hz * 2 ** (octaves_per_s * length * u + waver[int(s * SR):][:len(u)])
        lowpass = signal.butter(2, width_hz / 2, fs=SR, output="sos")
        a, b = signal.sosfilt(lowpass, rng.standard_normal((2, len(u))))
        phase = 2 * np.pi * np.cumsum(hz) / SR
        arch = np.sqrt(np.abs(np.sin(np.pi * u)))
        add(out, s, from_db(db) * arch * rms_one(a * np.sin(phase) + b * np.cos(phase)))
    return out * grip


def squeaks():
    """Narrow-band noise: swishes rise in pitch, belly pan hums stay level and squeaks fall."""
    swishes = glides(RISING_SWISHES, broken_db=6.0)
    hums = glides([(*row, 0) for row in BELLY_PAN_HUMS], broken_db=0)
    falling = glides([(*row, -SQUEAK_FALL_OCTAVES_PER_S) for row in FALLING_SQUEAKS], broken_db=3.5)
    return swishes + hums + falling


def plug_bumps():
    """Impact of fingers on the plug, voiced through the same resonances as the funnel."""
    return from_db(-4.0) * blows(FINGER_BUMPS, FUNNEL_MODES, chatter_s=0.025, chatter_db=-27.5, bare_db=-29,
                                 low_hz=145, top_hz=11100)


def rush():
    """Partial coherence: wide noise and swelling hiss, a little of it common to both ports."""
    body = spells(RUSH_SPELLS, RUSH_ATTACK_S, RUSH_RELEASE_S)[0]
    hiss = swells(RUSH_HISS_SWELLS)[0]
    shared, left, right = [body * colour(rng.standard_normal(N), RUSH_SPECTRUM)
                           + hiss * colour(rng.standard_normal(N), SKIN_SPECTRUM) for part in range(3)]
    return 0.27 * shared + 1.29 * np.array([left, right])


def bubbles(per_s, low_hz, cycles):
    """Bubble resonance: bubbles of uneven pitch and strength give short rising pings; rms 1."""
    out, t = np.zeros(N), TIME[:SR // 10]
    for when, pitch, size, phase in rng.random((int(per_s * N / SR), 4)):
        hz = low_hz * 4 ** pitch  # spread over two octaves
        envelope = np.exp(-t * hz / cycles) * (1 - np.exp(-t * hz))
        ping = np.sin(2 * np.pi * (hz * t * (1 + 4 * t) + phase)) * envelope
        add(out, when * N / SR, ping * size ** 2)
    return rms_one(out)


def spits(spatter):
    """Transient noise: the oil film bursts with a smack and a fizz; lesser bursts follow the spatter's strength."""
    draws = rng.random(int(SPITS_PER_S * N / SR))
    chance_db = SPIT_SPREAD_DB * rng.standard_normal((len(draws), 2))
    flow_db = 20 * np.log10(spatter[(draws * N).astype(int)])
    lesser = [(s, db + SMACK_DB + a, db + FIZZ_DB + b)
              for s, db, (a, b) in zip(draws * N / SR, flow_db, chance_db) if s > OIL_STREAM[0][0]]
    smacks, fizzes, t = np.zeros(N), np.zeros(N), TIME[:SR // 20]
    for s, smack_db, fizz_db in [*LOUD_SPITS, *lesser]:
        burst = rng.standard_normal(len(t)) * np.exp(-t / 0.0022)
        add(smacks, s, at_level(burst, smack_db))
        add(fizzes, s, at_level(burst, fizz_db))
    return from_db(1.0) * band(smacks, 3500, 6100) + from_db(6.0) * band(fizzes, 8100, 11570, order=3)


def oil():
    """Random excitation: the stream drums and gurgles in the funnel; its film tears into a wet crackle and spits."""
    drumming, spatter = in_time(OIL_STREAM)
    patter = from_db(3.0) * colour(grains(900, spread_db=0.5, clump_db=0.5), DRUMMING_SPECTRUM)
    gurgle = from_db(-4.5) * bubbles(70, low_hz=319.3, cycles=4.2)
    drum = from_db(-3.5) * drumming * (patter + gurgle)
    # the film tears in surges with gaps between; each band of tears comes in clumps of its own
    surges = from_db(2.5 * drift(40))
    edges = np.geomspace(900, 15000, 9)
    tears = sum(band(grains(3500, spread_db=5.5, clump_db=4.0), low, high)
                for low, high in zip(edges, edges[1:]))
    film = from_db(4) * colour(tears * surges, SPATTER_SPECTRUM)
    crackle = spatter * (film + from_db(-4) * bubbles(200, low_hz=1154, cycles=7))
    # heavy gouts set the funnel's own resonances going
    struck = resonate(grains(120, spread_db=3.0, clump_db=-1.0), FUNNEL_MODES)
    gouts = from_db(-6) * drumming * rms_one(band(struck, 200, 700, order=1))
    return drum + gouts + crackle + spits(spatter)


def grinding():
    """Sliding contact: a rough run of slips drives resonances that come and go as the contact moves."""
    rumble, rasp = spells(SCRAPE_SPELLS, SCRAPE_ATTACK_S, SCRAPE_RELEASE_S)
    slips = grains(1500, spread_db=0.5, clump_db=1.5)
    body = sum(resonate(slips * from_db(SLIP_COLOUR_DB * drift(30)), [mode]) for mode in COLLAR_MODES)
    low = rumble * evened(band(body, 220, 536), .03)
    high = rasp * evened(band(body, 680, 2160), .03)
    return from_db(1.0) * (low + high)


def funnel_knocks():
    """Impact on the plastic funnel excites its damped modes."""
    return from_db(-2.0) * blows(FUNNEL_KNOCKS, FUNNEL_MODES, chatter_s=0.01, chatter_db=-24.5, bare_db=-36.0,
                                 low_hz=167, top_hz=11800)


def wobbles(swell_s):
    """Critically damped envelopes on low sines: booms that swell and die within a few cycles."""
    out, t = np.zeros(N), TIME[:SR // 3]
    for s, hz, db in FUNNEL_WOBBLES:
        envelope = t / swell_s * np.exp(1 - t / swell_s)
        add(out, s, from_db(db) * envelope * np.sin(2 * np.pi * hz * t))
    return out


def drops():
    """Bubble resonance: each drop traps a bubble that rings briefly and rises in pitch."""
    out, t = np.zeros(N), TIME[:SR // 12]
    envelope = (1 - np.exp(-t / .0015)) * np.exp(-t / DROP_RING_S)
    for s, hz, db in OIL_DROPS:
        cycles = hz * t * (1 + DROP_RISE_PER_S * t / 2)
        add(out, s, from_db(db) * envelope * np.sin(2 * np.pi * cycles))
    return out


def pipe():
    """Modal decay: high modes of the steel pipe ring as sines; a gripping hand shortens them."""
    out, t = np.zeros(N), TIME[:SR]
    for s, db, upper_db, freedom in PIPE_BLOWS:
        for hz, mode_db, t60 in PIPE_MODES:
            level_db = db + mode_db + upper_db * (hz > 7500)
            add(out, s, from_db(level_db - 60 * t / (t60 * freedom)) * np.sin(2 * np.pi * hz * t))
    return out


def collar_jerks():
    """Impact: the collar's modes are struck afresh at each jerk up the pipe."""
    return from_db(-2) * blows(JERKS, COLLAR_MODES, chatter_s=0.0091, chatter_db=-25.5, bare_db=-46,
                               low_hz=204, top_hz=11400)


def garage(x):
    """Diffuse reverberation: convolution with noise whose decay varies with frequency; bass alike at both ports."""
    t, edges = TIME[:SR], np.geomspace(50, 13000, 9)
    tail, white = 0, rng.standard_normal((2, SR))
    for low, high in zip(edges, edges[1:]):
        hz = np.sqrt(low * high)
        noise = white if hz > 250 else white[[0, 0]]
        tail = tail + band(noise, low, high) * from_db(-60 * t / at_hz(GARAGE_DECAY, hz))
    tail = tail * (1 - np.exp(-t / 0.0076))
    return signal.fftconvolve(x[None], tail / np.sqrt(np.sum(tail ** 2) / 2), axes=1)[:, :N]


def ports(x, shift_rate, lead_s=0.0):
    """Phase and level differences between two ports, plus ever shifting reflections from the belly pan."""
    size = next_fast_len(N + SR // 10, real=True)
    hz = np.fft.rfftfreq(size, 1 / SR)
    lead, balance_db = at_hz(PORT_RESPONSE, hz), at_hz(PORT_RESPONSE, hz, axis=2)
    share = np.clip(at_hz(PORT_RESPONSE, hz, axis=3), 0, 1)
    sides = np.array([[1], [-1]]) / 2
    direct = rfft(x, size) * np.exp(1j * sides * (lead + 2 * np.pi * hz * lead_s))
    # reflections come 2.5 ms later, with a phase that wanders
    wander = np.exp(1j * np.pi * np.array([drift(shift_rate), drift(shift_rate)]))
    turned = np.real(signal.hilbert(x, size)[:N] * wander)
    scattered = rfft(turned, size) * np.exp(-2j * np.pi * hz * .0025)
    both = np.sqrt(1 - share) * direct + np.sqrt(share) * scattered
    return irfft(both * from_db(sides * balance_db), size)[:, :N]


def scene():
    """Superposition of near sound at the two ports, the garage's reverberation and faint background noise."""
    fingers, wrench, airy, plug = hand(), wrench_blows(), squeaks(), plug_bumps()
    pour = oil() + grinding() + from_db(2.5) * wobbles(swell_s=0.0055) + drops()
    funnel, ring = funnel_knocks() + collar_jerks(), pipe()
    near = ports(wrench + plug + fingers, shift_rate=70, lead_s=DRAIN_LEAD_S)
    near = near + ports(funnel + pour, shift_rate=70) + ring * from_db([[1], [-2]])
    # far sounds are roomier than the funnel right at the microphone
    sent = from_db(-6) * (wrench + airy) + from_db(-6.5) * (plug + fingers)
    sent = sent + from_db(-11.5) * funnel + from_db(-8.5) * (pour + ring)
    background = [colour(rng.standard_normal(N), RUBBING_SPECTRUM) for side in range(2)]
    return near + garage(sent) + from_db(-3.5) * airy + rush() + from_db(-102) * np.array(background)


def record(dry):
    """Filtering and saturation: the highest treble is shelved down, peaks are rounded, the top is cut."""
    shelf = signal.cheby2(10, 24, min(TREBLE_EDGE_HZ, .45 * SR), fs=SR, output="sos")
    rounded = 1.177 * np.tanh(signal.sosfilt(shelf, dry) / 1.457)
    return signal.sosfilt(signal.cheby2(12, 70, CUTOFF_HZ, fs=SR, output="sos"), rounded)


dry = scene()
out = record(dry)
store_pcm(out)
```